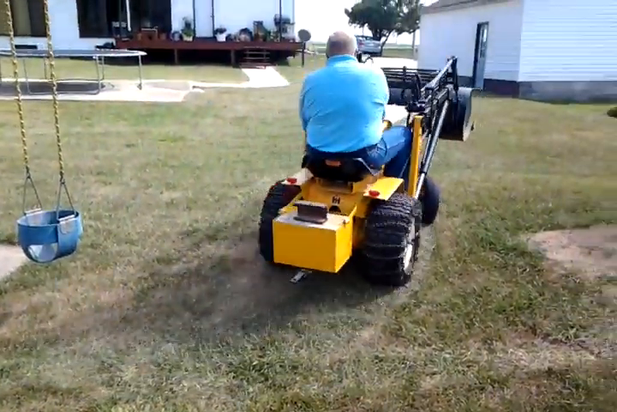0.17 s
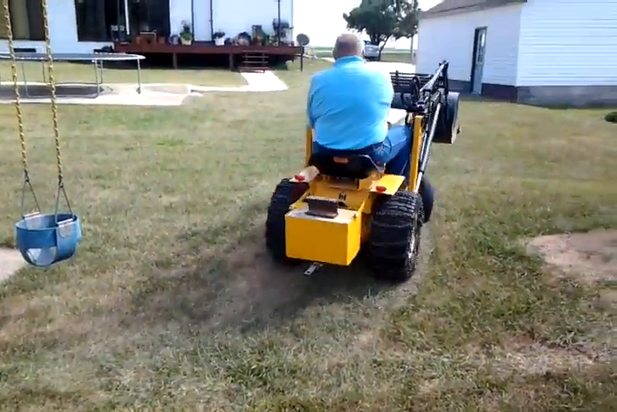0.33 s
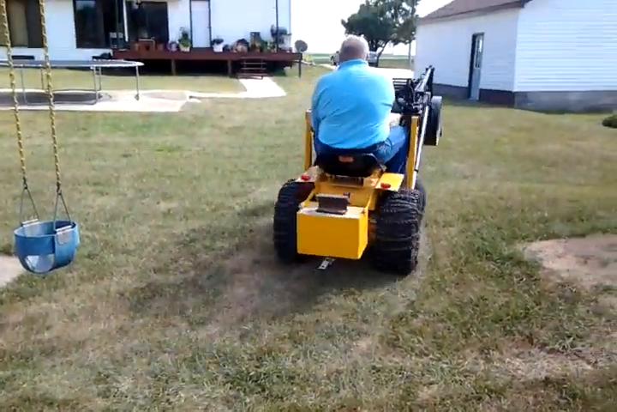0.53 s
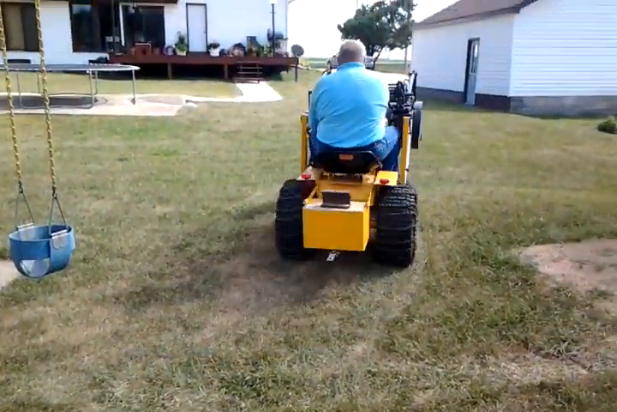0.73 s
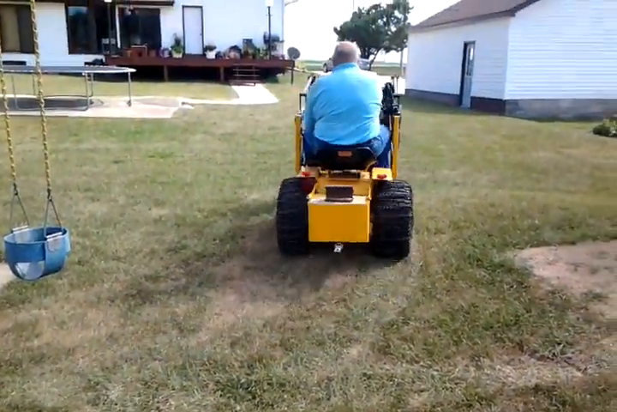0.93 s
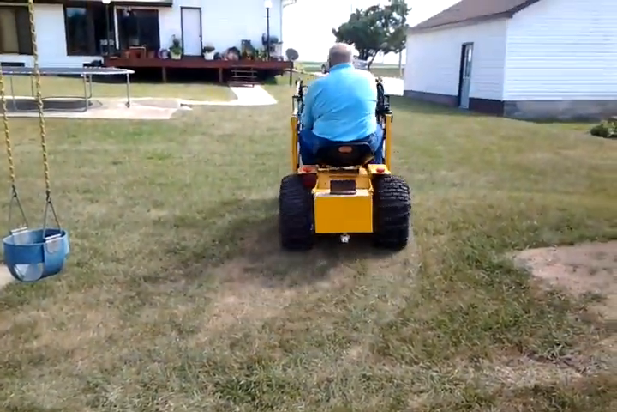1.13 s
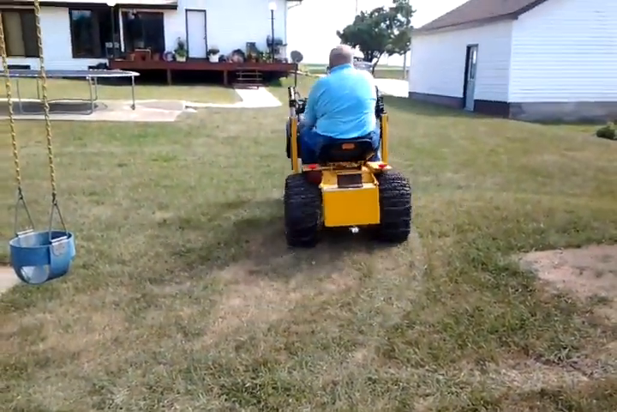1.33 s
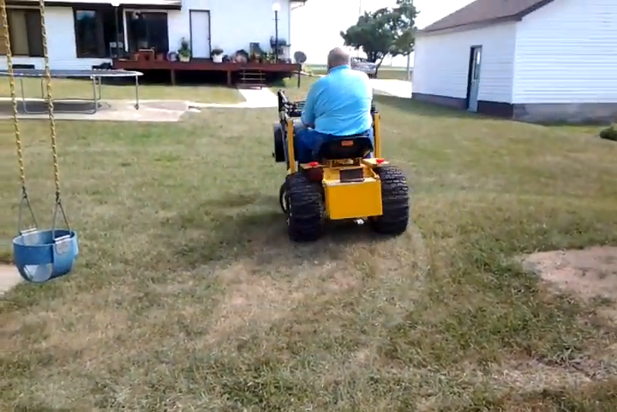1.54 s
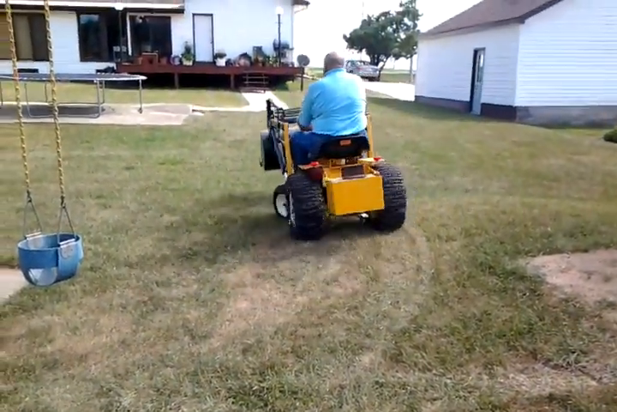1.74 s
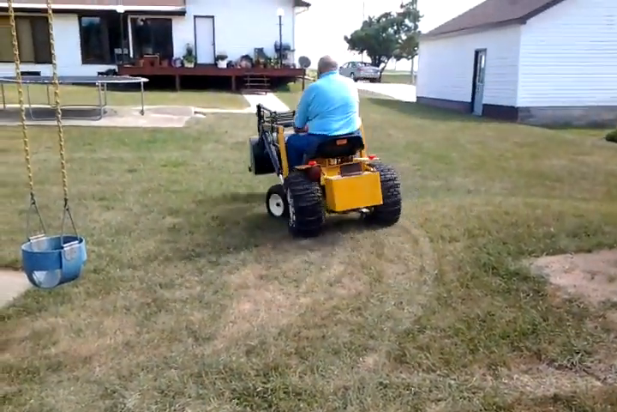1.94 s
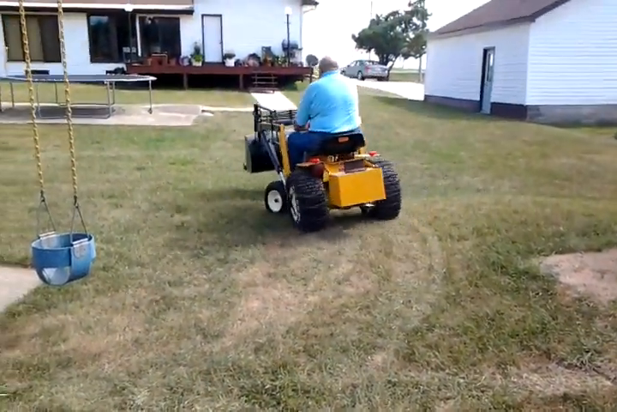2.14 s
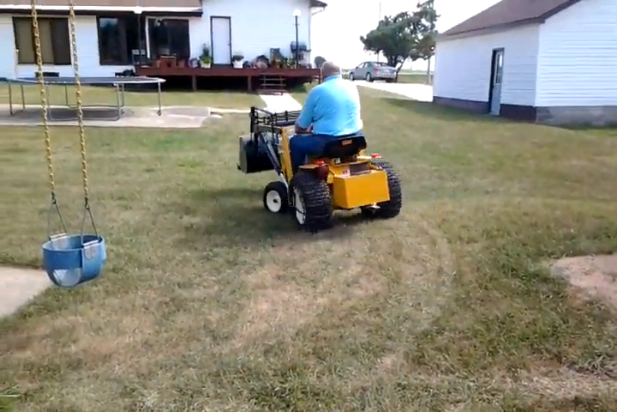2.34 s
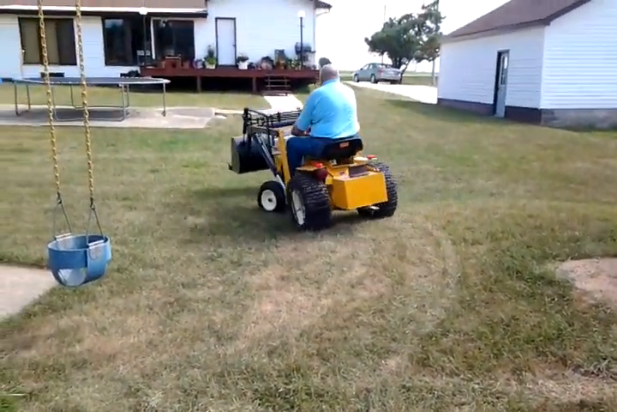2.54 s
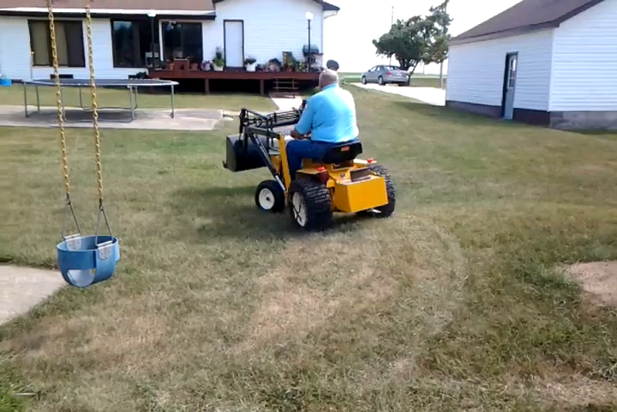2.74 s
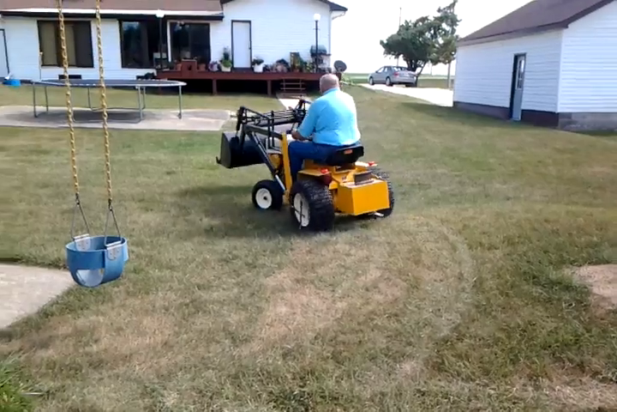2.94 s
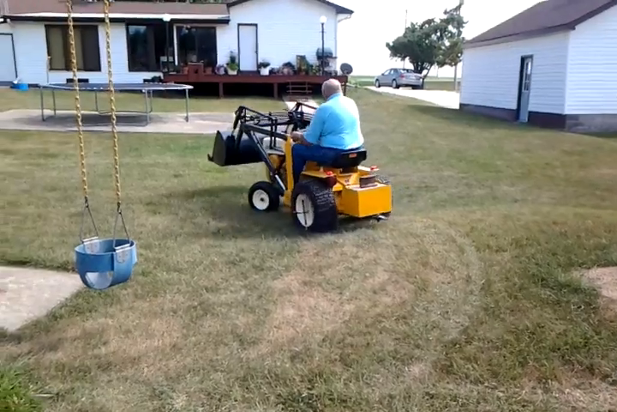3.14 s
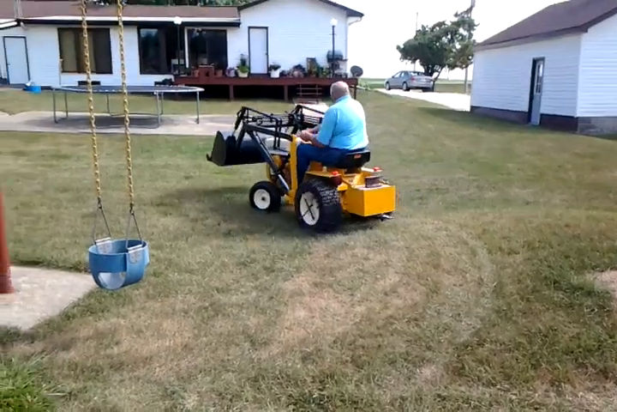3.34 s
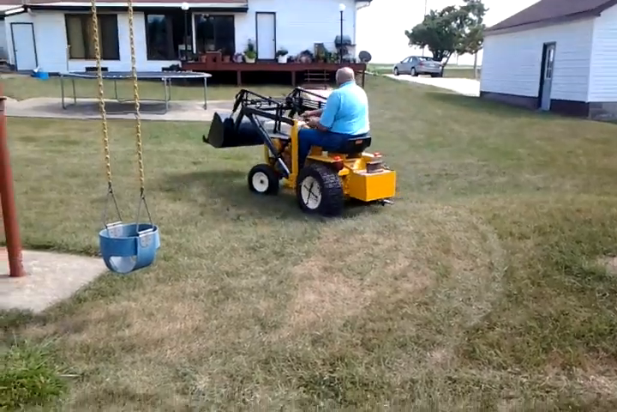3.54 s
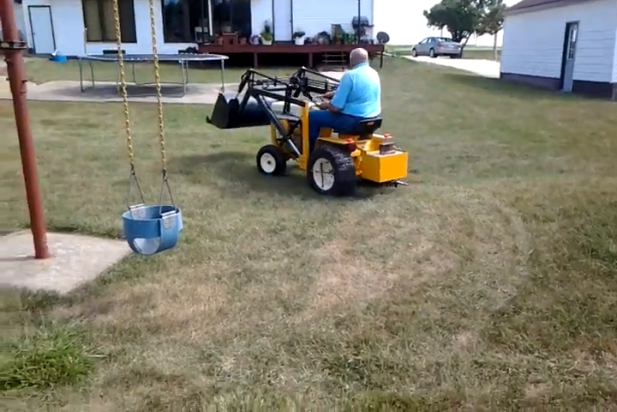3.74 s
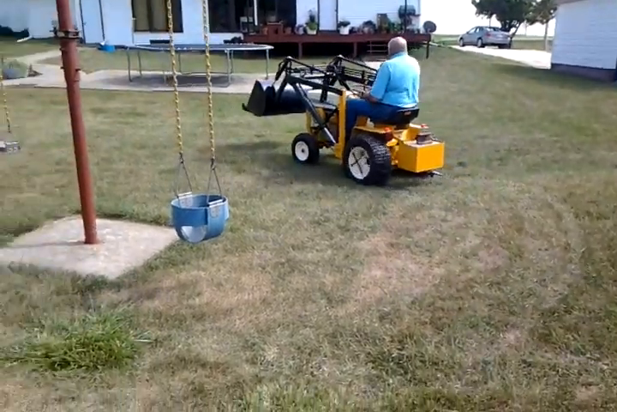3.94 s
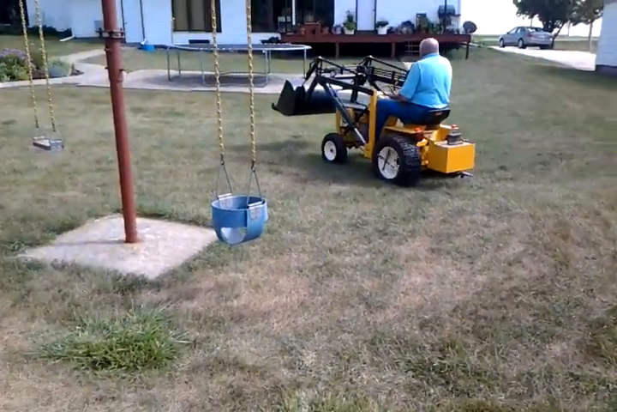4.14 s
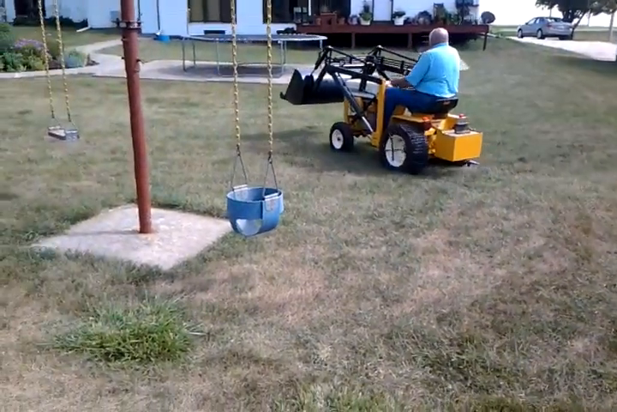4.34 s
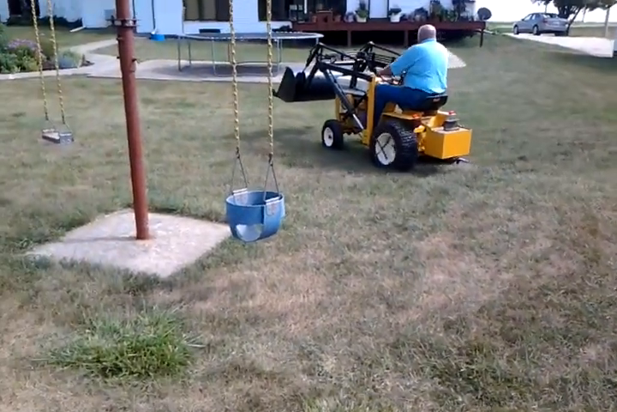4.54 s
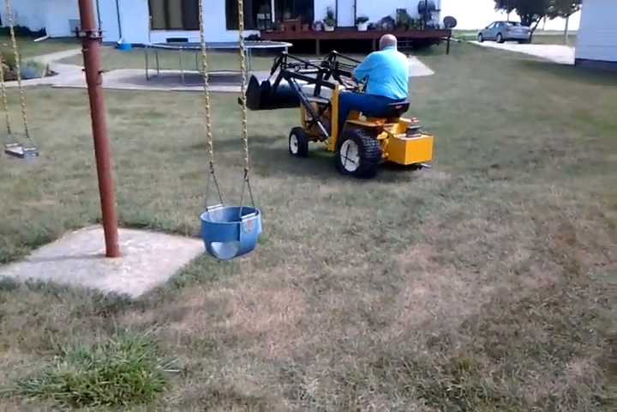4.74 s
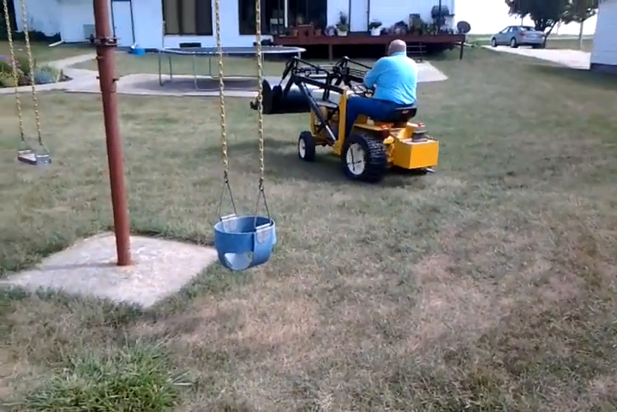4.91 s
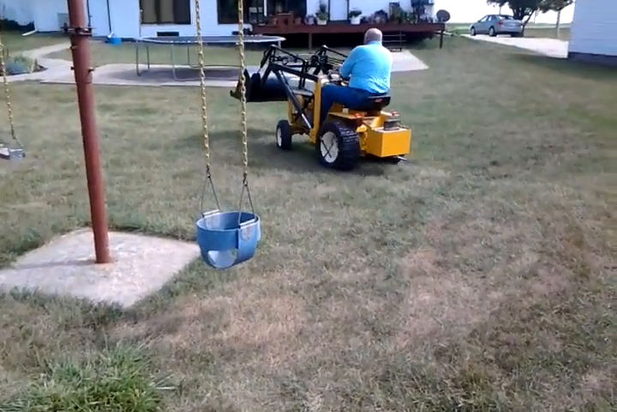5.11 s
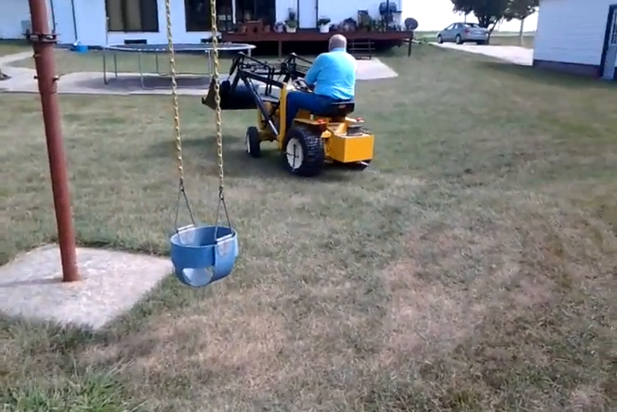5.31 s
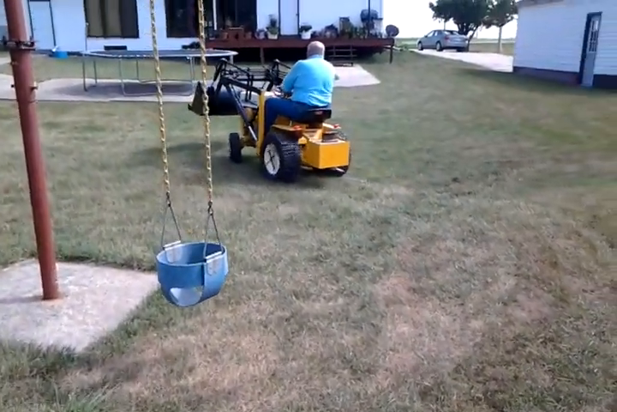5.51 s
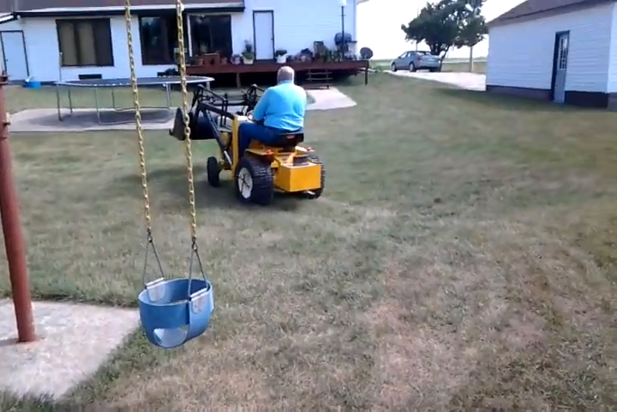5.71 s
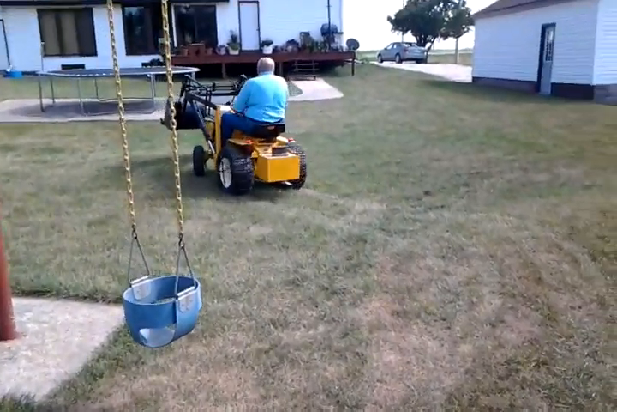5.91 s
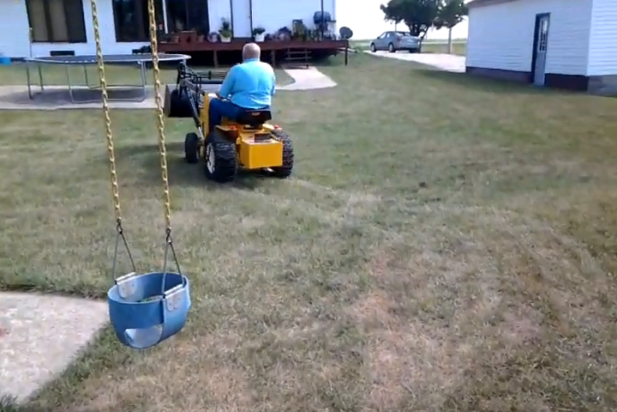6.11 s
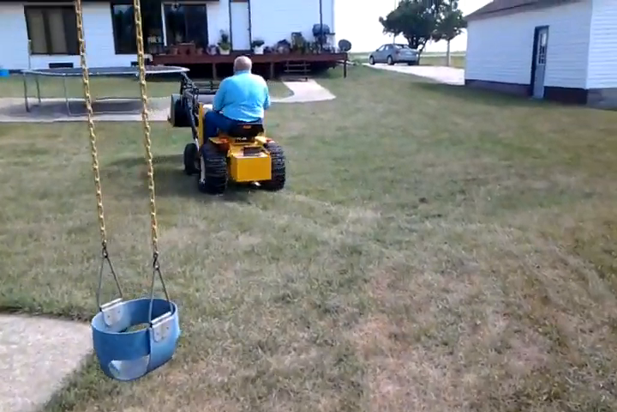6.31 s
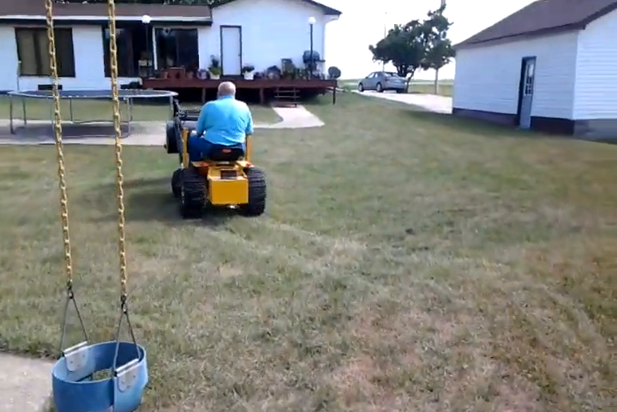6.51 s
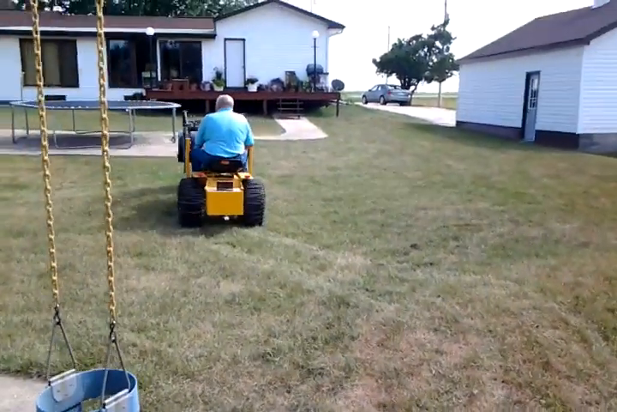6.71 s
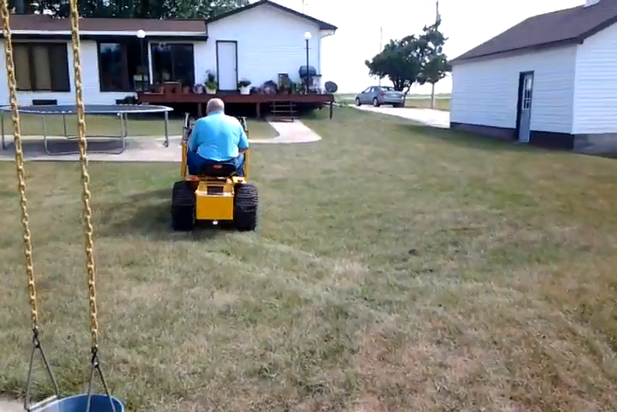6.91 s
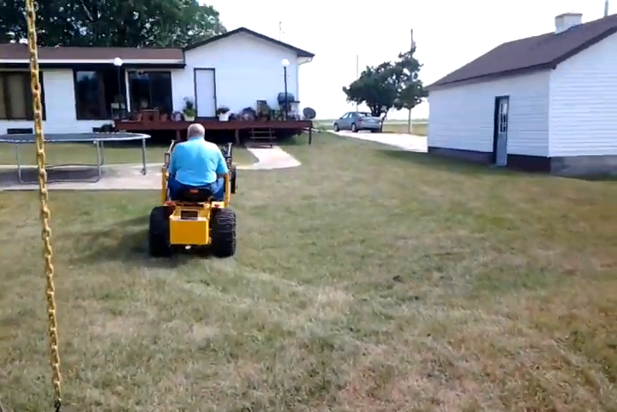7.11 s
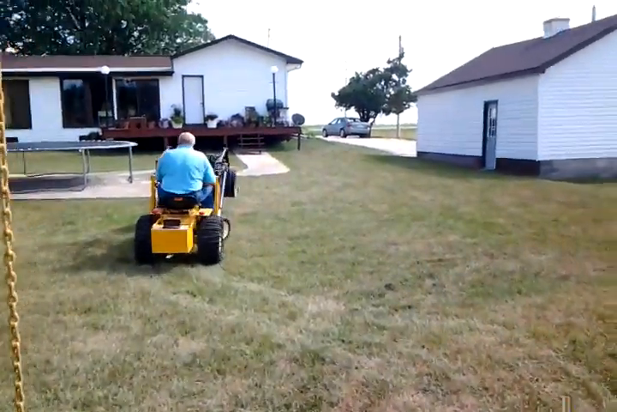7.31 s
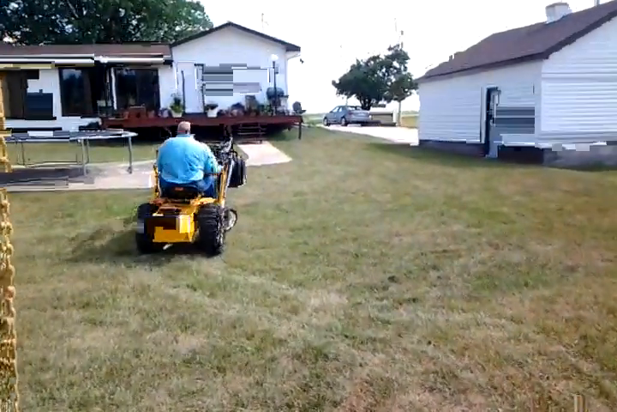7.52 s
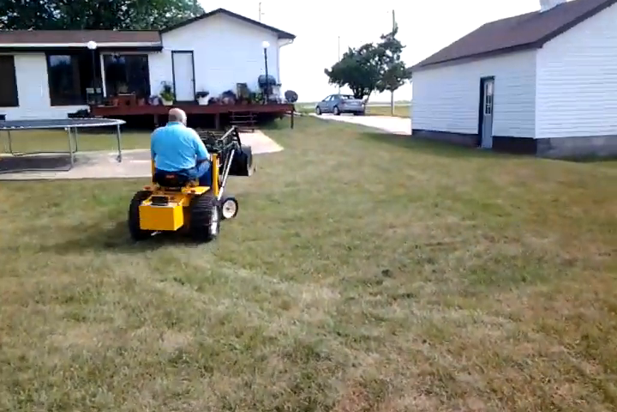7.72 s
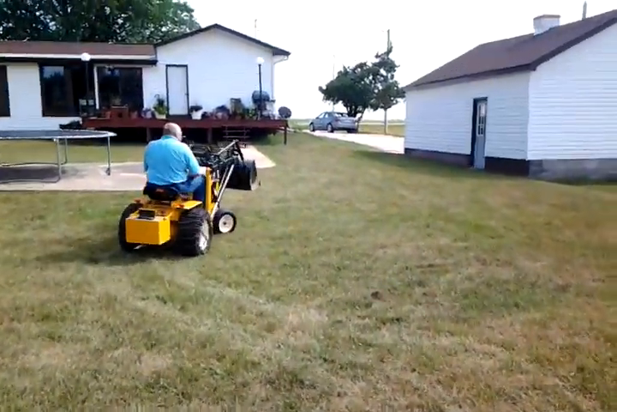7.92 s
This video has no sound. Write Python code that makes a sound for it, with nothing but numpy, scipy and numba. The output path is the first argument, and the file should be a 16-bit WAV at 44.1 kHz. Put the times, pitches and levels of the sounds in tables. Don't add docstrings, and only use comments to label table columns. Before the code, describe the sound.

A small single-cylinder tractor engine putters fast and steadily across a lawn, with metallic clatter and faint squeals, gradually softening as it drives off.

```python
import sys
import numpy as np
from scipy import signal
from scipy.fft import rfft, irfft
from scipy.io import wavfile
from scipy.ndimage import uniform_filter1d
from numba import njit

SR = 44100
rng = np.random.default_rng(int(sys.argv[2]) if len(sys.argv) > 2 else 0)


def persist_wave(psi):
    counts = np.round(np.clip(psi, -1, 1) * 32767).astype(np.int16)
    wavfile.write(sys.argv[1], SR, np.atleast_2d(counts).T)


def volts_from_db(level):
    exponent = np.asarray(level, float) / 20
    return 10 ** exponent


N = 351036
T = np.arange(N) / SR


def curves(table):
    s, *columns = np.transpose(table)
    return [np.interp(T, s, c) for c in columns]


def level(x, db):
    return x * volts_from_db(db) / np.sqrt(np.mean(x ** 2))


def peak(x, db):
    return x * volts_from_db(db) / np.max(np.abs(x))


@njit
def svf(x, hz, width):
    out, b, l = np.empty((2, len(x))), 0., 0.
    g = np.tan(np.pi * hz / SR)
    for i in range(len(x)):
        k = width[i] / hz
        v = (b + g * (x[i] - l)) / (1 + g * (g + k))
        out[0, i] = v
        out[1, i] = x[i] - k * v - l - g * v
        b, l = 2 * v - b, l + 2 * g * v
    return out


def ring(x, hz, width_hz):
    return svf(x, 1. * hz, width_hz + np.zeros(N))


def hiss(hz, width_hz, drive=None):
    x = rng.standard_normal(N) if drive is None else drive
    once = ring(x, hz, 1.78 * width_hz)[0]
    return level(ring(once, hz, 1.78 * width_hz)[0], 0)


def walk(rate_hz):
    hold = int(SR / rate_hz)
    steps = np.repeat(rng.standard_normal(N // hold + 1), hold)
    return 1.3 * uniform_filter1d(uniform_filter1d(steps, hold), hold)[:N]


def bump(at_s, length_s, clock_s=T):
    return np.exp(-.5 * ((clock_s - at_s) / length_s) ** 2)


def drive_path():
    # time in seconds, distance in metres, engine side turned to the camera 0-1, pump load 0-1.
    drive_points = [(0, 4.06, 0.9, 0.9), (.3, 4.28, 0.7, 1), (.8, 4.3, 0.07, 0.7), (1.2, 5.52, 0, 0.8),
                    (1.9, 5.56, .2, 0.1), (2.5, 5.96, 0.4, 0), (3.1, 7.87, 0.71, 0.83), (3.7, 7.16, 0.8, 1),
                    (3.95, 8.1, 0.9, 0.3), (4.5, 8.1, 0.91, 0), (5.1, 8.03, 1, 0.1), (5.7, 7.65, 0.8, 0.4),
                    (6.27, 8.3, 0.9, 0.2), (6.42, 8.8, 0.3, 0), (7.0, 9.4, 0.1, 0), (7.5, 8.7, 0.2, 0.05),
                    (7.96, 7.6, 0.4, 0)]
    metres, side, load = curves(drive_points)
    return 20 * np.log10(metres / 4), side, np.clip(load, 0, 1)


def heard(part, path):
    near_db, share, side_db = part
    return near_db - share * path[0] + side_db * path[1]


def exhaust(clock_s, hz, apart_s, chance, path):
    exhaust_db = heard((-11, 0.95, 0.23), path)
    blow = volts_from_db(.3 * chance[0]) * bump(.0063 - apart_s, .0013, clock_s)
    thump = peak(-ring(blow, 133.5, 51)[1], exhaust_db)
    opening = volts_from_db(1.7 * chance[3]) * bump(.0062 - apart_s, .0011, clock_s)
    bark = peak(-hiss(230, 85, opening), exhaust_db - 20.5)
    over_cruise_hz = hz - 22
    throttle_hz_per_s = uniform_filter1d(np.gradient(hz) * SR, SR // 8)
    cough = volts_from_db(1.0 * chance[3]) * bump(.0026 + .0007 * over_cruise_hz, .0004, clock_s)
    cough_db = heard((-32, 1.0, -2.5), path) + 1.8 * throttle_hz_per_s + 4 * over_cruise_hz
    return thump + bark + peak(-hiss(285, 50, cough), cough_db)


def intake(clock_s, apart_s, chance, path):
    damping_hz = 26.1 + 3.5 * path[0] + 35.4 * (1 - path[2])
    gulp = volts_from_db(.3 * chance[1]) * bump(.017 + apart_s, .0009, clock_s)
    return peak(ring(gulp, 110.8, damping_hz)[0], heard((-9, 0.64, -4), path))


def valves(clock_s, hz, chance, path):
    bonnet_open = np.minimum(2.2 * path[1], 1)
    crack_db = heard((-37.5, 0.072, 8.2), (path[0], bonnet_open))
    seat_s = .0149 + .0028 * (1 - path[1]) + .00013 * chance[4]
    bounce_s = seat_s + .007145 + 0.1 * path[0]
    knock = volts_from_db(1.0 * chance[2]) * bump(seat_s, .0003, clock_s)
    knock += .6 * volts_from_db(1.8 * chance[5]) * bump(bounce_s, .0003, clock_s)
    upper = volts_from_db(1.2 * chance[1]) * np.interp(T - .0013, T, knock)
    out = peak(hiss(691.4, 52, knock) - .6 * hiss(840, 60, upper), crack_db + 3.25)
    out += volts_from_db(crack_db - 15.5) * bump(seat_s + .005, .004, clock_s) * hiss(820, 220)
    out += volts_from_db(-33) * bump(0.78, .35) * bump(.019, .0035, clock_s) * hiss(596, 120)
    lift = bump(0, .002, clock_s) + bump(1 / hz, .003, clock_s)
    out += volts_from_db(crack_db - 16.5) * lift * hiss(780, 130)
    tappets = sum(bump(s, .0012, clock_s) for s in (0, .007, .031, .041))
    out += volts_from_db(crack_db - 24) * tappets * hiss(1700, 600)
    return out + volts_from_db(crack_db - 27) * bump(.021, .003, clock_s) * hiss(3700, 1200)


def frame_shake(turns, path):
    crank = np.cos(4 * np.pi * (turns - .272)) - .12 * np.cos(2 * np.pi * (turns - .55))
    out = volts_from_db(heard((-34, 0.65, -1), path)) * crank
    out += volts_from_db(-40.5) * (path[1] - 0.32) * np.cos(2 * np.pi * (3 * turns + 0.18))
    return out + volts_from_db(heard((-33.5, 6.7, -3), path)) * np.cos(2 * np.pi * (8 * turns - .15))


def engine(turns, hz, path):
    clock_s = turns % 1 / hz
    cycle = np.floor(turns).astype(int) + 1
    chance = rng.standard_normal((N // 1000, 6))[cycle].T
    apart_s = np.interp(T, (0, 1.2), (.0005, 0))
    gas = exhaust(clock_s, hz, apart_s, chance, path) + intake(clock_s, apart_s, chance, path)
    return gas + valves(clock_s, hz, chance, path) + frame_shake(turns, path)


def clatter(turns, memory):
    fresh = rng.standard_normal((N // 1500, 1024))
    fresh += .5 * np.roll(fresh, 512, axis=1)
    pattern = signal.lfilter([1], [1, -memory], fresh, axis=0)[20:].ravel()
    return level(np.interp((turns + 1) * 1024, np.arange(pattern.size), pattern), 0)


def rush(turns, path):
    zone_hz = (420, 800, 1600, 4000, 5800)
    # constant in dB (drops out, as each zone is centred on its mean), share of the spreading loss, dB
    zone_parts = [
        (0.1, 1.494, -3),
        (0.1, 1, 1),
        (0.1, 1.096, 1),
        (0.1, 0.998, 3),
        (0.1, 1.497, 3),
    ]
    # frequency in Hz, density in dB per Hz.
    noise_colour = [(40, -11), (120, 1.5), (300, 6), (520, -17), (1150, -12.5), (2600, -24), (5000, -21),
                    (6500, -34.5), (7600, -66)]
    # frequency in Hz, width in Hz, level in dB, dB gained side on.
    panel_rings = [(674, 157, -46.5, 0), (808, 113, -44, 0), (920, 60, -51, -1.5), (1282, 180, -53, 1.5),
                   (1495, 190, -48.5, 0.5), (1768, 200, -55.5, -0.5), (2098, 120, -55, -2.2),
                   (2363, 180, -61.5, -9), (2870, 200, -61, -1), (3060, 250, -61, -2),
                   (3535, 270, -57.5, 3.5), (4253, 120, -64, -1)]
    # frequency in Hz, width in Hz, level in dB, dB gained side on.
    arm_rings = [(3800, 230, -64, -4), (4460, 120, -64.5, 1.5), (4730, 260, -62.5, -0.5),
                 (5710, 290, -73.5, -2.5), (6150, 270, -76, 0.7), (7230, 140, -79.5, 2)]
    zones_db = np.array([heard(z, path) for z in zone_parts])
    zones_db -= zones_db.mean(axis=1, keepdims=True)
    colour_hz, colour_db = np.transpose(noise_colour)
    bands = []
    for hz in 45 * 2 ** np.arange(0, 7.4, .4):
        density_db = np.interp(np.log(hz), np.log(colour_hz), colour_db)
        bands.append((hz, hz / 3, density_db + 10 * np.log10(hz) - 77, 0))
    gears = clatter(turns, memory=.75)
    out = np.zeros(N)
    for hz, width_hz, db, side_db in bands + list(panel_rings) + list(arm_rings):
        share = np.array([np.interp(np.log(hz), np.log(zone_hz), row) for row in np.eye(len(zone_parts))])
        locked = np.interp(hz, (150, 250, 1000, 2500, 6000), (0, .15, .12, .25, .2))
        drive = np.sqrt(locked) * gears + np.sqrt(1 - locked) * rng.standard_normal(N)
        drift_db = .35 * walk(2) + .85 * walk(8)
        ring_db = db + side_db * (path[1] - .5) + share @ zones_db + drift_db
        out += volts_from_db(ring_db) * hiss(hz, width_hz, drive)
    lag = SR * (1 - 0.17 * path[0]) / 1000
    out += 0.15 * np.interp(np.arange(N) - lag, np.arange(N), out)
    return out * volts_from_db(.5 * np.cos(4 * np.pi * (turns - .45)))


def pump(turns, path):
    # multiple of the cycle, level in dB at 4 m, dB gained side on, dB gained without load.
    tooth_tones = [(12, -58, -7, 0), (13, -52, -13, 0), (14, -60, -6, 0), (16, -53, -2, -4),
                   (20.93, -53, 0, -9)]
    # multiple of the cycle, level in dB.
    blade_tones = [(24, -70), (35, -70), (30, -63), (31, -66), (36, -58), (96, -68), (101, -68)]
    # centre in seconds, length in seconds, multiple, level in dB.
    load_swells = [(.32, .1, 20.93, -45), (1.25, .15, 20.93, -58), (2.0, .2, 20.93, -54),
                   (3.65, .08, 20.93, -55), (2.9, .6, 20.93, -61), (6.83, .12, 20.93, -55),
                   (6.9, .4, 36, -54), (2.0, .15, 16, -50), (.2, .15, 16, -51), (1.5, .25, 16, -55),
                   (3.1, .6, 16, -57), (2.4, .3, 14, -46), (3.15, .14, 14, -41), (1.25, .12, 36, -46),
                   (1.9, .25, 36, -48), (2.7, .5, 35, -53), (3.5, .13, 36, -49), (5.3, .8, 36, -54),
                   (5.0, .9, 24, -62), (.75, .2, 30, -48), (2.6, .5, 30, -52), (5.6, .45, 30, -57),
                   (.5, .5, 31, -52), (5.5, .8, 31, -56)]
    tones = {}
    for order, db, side_db, idle_db in tooth_tones:
        tones[order] = volts_from_db(heard((db, 1, side_db), path) + idle_db * (0.5 - path[2]))
    for order, db in blade_tones:
        tones[order] = volts_from_db(db)
    for s, length_s, order, db in load_swells:
        tones[order] = tones[order] + volts_from_db(db) * bump(s, length_s)
    out = np.zeros(N)
    for order, rms in tones.items():
        unsteady = volts_from_db(.7 * walk(9))
        out += np.sqrt(2) * rms * unsteady * np.sin(2 * np.pi * order * turns + .4 * walk(8))
    return out


def loader():
    # centre in seconds, length in seconds, frequency in Hz, level in dB.
    band_swells = [(0.11, 0.078, 1534, -40), (0.38, 0.12, 1530, -44.5), (0.47, 0.16, 2200, -58),
                   (2.2, 0.19, 1574, -60), (7.5, .15, 900, -46.5), (7.199, 0.19, 934, -45),
                   (3.2, 0.16, 2340, -55.5), (4.3, 0.099, 1513, -45.5), (4.87, 0.17, 1750, -51.5),
                   (5.8, 0.29, 4000, -64.5), (5.996, 0.26, 4160, -58), (6.43, 0.1, 4200, -58),
                   (7.46, 0.094, 1620, -45), (7.6, 0.32, 3760, -58.5), (7.45, .15, 4180, -62),
                   (7.25, .12, 2580, -61), (2.7, .25, 2850, -62), (2.5, .4, 3350, -63),
                   (.5, .25, 2900, -58), (.9, .15, 400, -48), (7, 0.23, 2360, -59),
                   (1.4, 0.19, 815, -42.5), (0.22, .15, 4715, -60.5), (1, .12, 6100, -65.5),
                   (1.79, .15, 4950, -62.5), (2.2, .2, 4400, -63), (3.31, .15, 5000, -70),
                   (1.97, .1, 4500, -57.5), (1.96, 0.12, 3014, -56), (1.97, 0.11, 3100, -61),
                   (2.0, .1, 4900, -63), (3.5, 0.27, 3700, -62), (3, 0.17, 5100, -60),
                   (1.7, 0.23, 2777, -59.5), (2.9, 0.14, 2131, -55), (4.5, 0.26, 2680, -69),
                   (5.1, 0.17, 4400, -60.5), (5.22, 0.18, 1227, -54), (6.03, 0.14, 2110, -55),
                   (6.95, .12, 4435, -64.5), (6.9, 0.34, 3596, -63.5), (5.5, 0.13, 1200, -51.5),
                   (5.65, 0.11, 1400, -51), (6.5, .12, 1300, -51), (6.5, .12, 960, -47.5),
                   (7.0, .12, 5880, -69), (5.3, .25, 2080, -56), (9, 0.15, 2520, -61.5),
                   (4.2, .3, 8800, -73.5), (7.57, .06, 920, -45), (4.1, 0.076, 310, -50),
                   (6.7, 0.1, 270, -56.5), (0.6, .4, 410, -46.5), (3.8, 0.056, 940, -51),
                   (5.8, 0.047, 1100, -45.5)]
    # centre in seconds, length in seconds, frequency in Hz, level in dB.
    chain_rattles = [
        (6.22, .01, 4200, -60),
        (6.457, .007, 5900, -55),
        (5.76, .012, 7100, -64),
        (6.9, .05, 6600, -70),
    ]
    swells = sum(volts_from_db(db) * bump(s, length_s) * hiss(hz, 92) for s, length_s, hz, db in band_swells)
    rattles = sum(volts_from_db(db) * bump(s, length_s) * hiss(hz, hz / 5) for s, length_s, hz, db in chain_rattles)
    return swells + rattles


def walls(motor, path):
    # time in seconds, extra path by the house in ms, by the garage in ms.
    echo_delays = [(0, 37, 19), (2.5, 32.5, 20), (3.6, 32, 21.5), (4.6, 30, 22), (5.5, 28, 23.5),
                   (6.4, 24, 26), (7.96, 18.5, 28)]
    house, garage = (-26, -1.3, .5), (-36.5, -1.2, 10)
    thump = 1.5 * ring(motor, 135, 200)[0]
    out = np.zeros(N)
    for wall, ms in zip((house, garage), curves(echo_delays)):
        out += volts_from_db(heard(wall, path)) * np.interp(T - ms / 1000, T, thump)
    return out


def wind():
    # centre in seconds, length in seconds, level in dB.
    wind_gusts = [
        (2.12, .08, -44),
        (2.45, .08, -48),
        (4.78, .08, -48),
        (5.5, .1, -52),
        (5.75, .09, -46),
        (7.0, .1, -52),
    ]
    gusts = sum(volts_from_db(db) * bump(s, length_s) for s, length_s, db in wind_gusts)
    buffets = (hiss(50, 70) + hiss(27, 20)) * volts_from_db(3 * walk(20))
    return gusts * buffets + volts_from_db(-55) * hiss(45, 50)


def ragged_top(x):
    edge_hz, spread_hz = 7470, 100
    hz, _, cells = signal.stft(x, SR, nperseg=2048)
    block_starts = np.minimum(1024 * np.arange(cells.shape[-1]), N - 1)
    edge = edge_hz + spread_hz * walk(4)[block_starts]
    coarse = rng.standard_normal((len(hz) // 2 + 1, len(edge) // 4 + 1))
    holes = np.repeat(np.repeat(coarse, 2, 0), 4, 1)[:len(hz), :len(edge)]
    kept = hz[:, None] < edge + 1.5 * spread_hz * holes
    return signal.istft(cells * kept, SR)[1][..., :N]


def mirror(x):
    camera_rate_hz = 16000
    above_hz = np.fft.rfftfreq(N, 1 / SR) - camera_rate_hz / 2
    gain = (above_hz > 0) * volts_from_db(-5 - .021 * above_hz)
    return irfft(rfft(2 * x * np.cos(2 * np.pi * camera_rate_hz * T)) * gain, N)


def scene():
    # time in seconds, engine cycles (firings) in Hz.
    engine_speed = [(0.0, 21.86), (0.5, 21.684), (1.31, 22.377), (1.6, 22.369), (2.0, 22.929),
                    (2.63, 22.844), (2.95, 23.025), (3.81, 22.1), (4.22, 21.921), (5.87, 22.108),
                    (6.1, 21.741), (6.34, 22.253), (6.59, 21.809), (6.84, 22.705), (7.06, 21.758),
                    (7.33, 22.591), (7.59, 21.846), (7.96, 22.578)]
    hz, path = curves(engine_speed)[0], drive_path()
    turns = -.411 + np.cumsum(hz) / SR
    motor = engine(turns, hz, path)
    motor += bump(0, .012) * (np.interp(turns + 1, turns, motor) - motor)
    machine = motor + rush(turns, path) + pump(turns, path) + loader()
    return (machine + walls(motor, path) + wind())[None]


def top_cut(x):
    return signal.sosfilt(signal.butter(12, 8915, fs=SR, output="sos"), x)


def record(dry):
    rolloff = signal.butter(7, 6800, fs=SR, output="sos")
    top = ragged_top(signal.sosfilt(rolloff, dry))
    return top_cut(top + mirror(top))


dry = scene()
out = record(dry)
persist_wave(out)
```